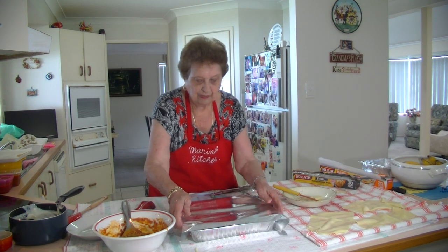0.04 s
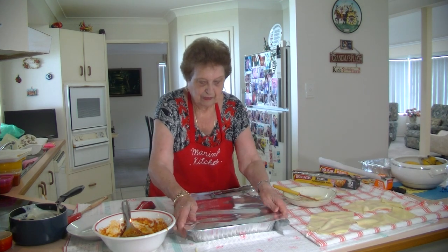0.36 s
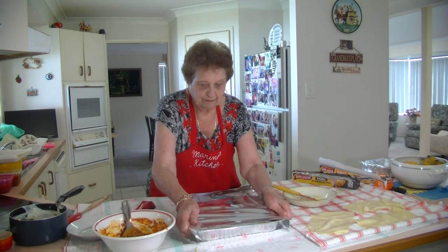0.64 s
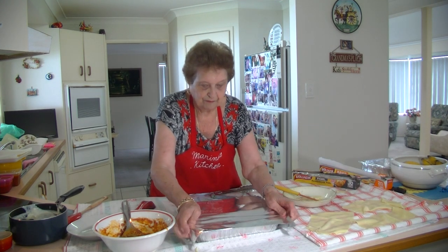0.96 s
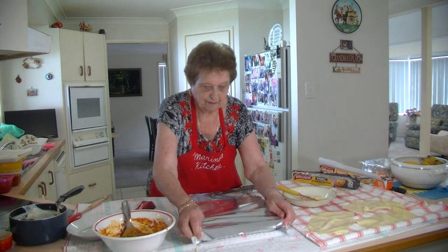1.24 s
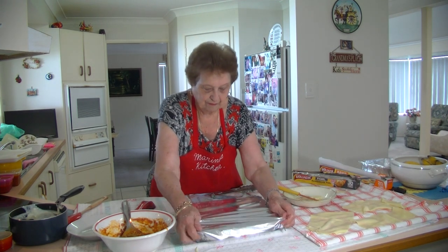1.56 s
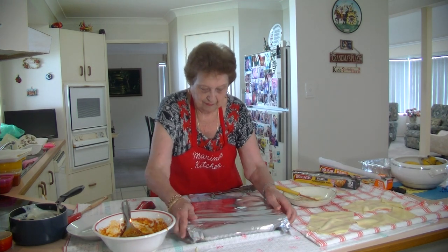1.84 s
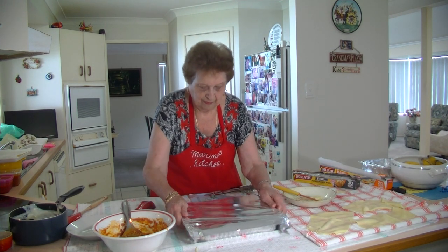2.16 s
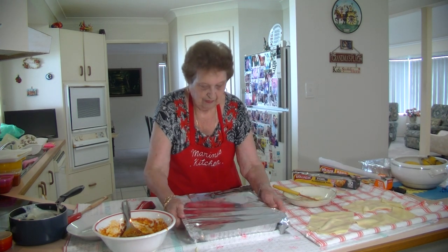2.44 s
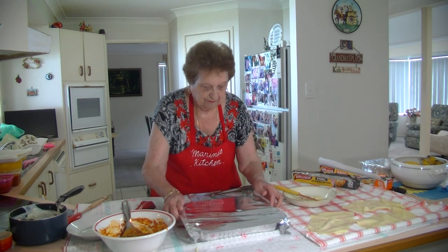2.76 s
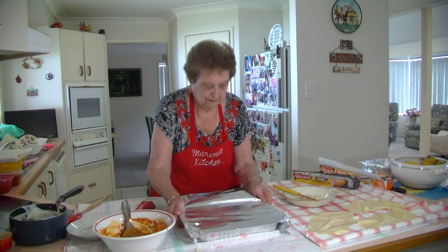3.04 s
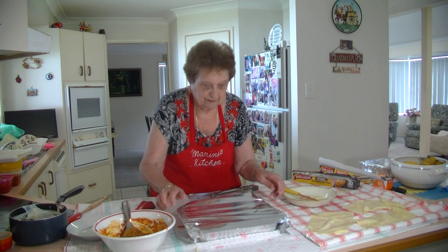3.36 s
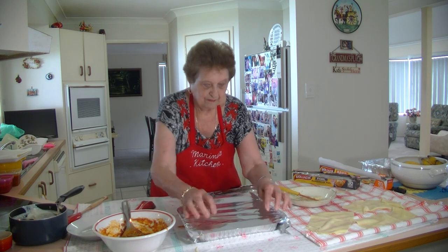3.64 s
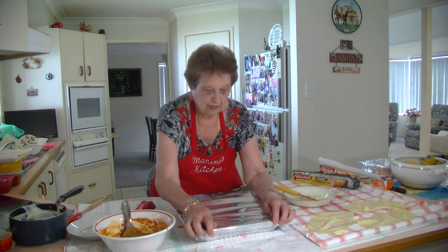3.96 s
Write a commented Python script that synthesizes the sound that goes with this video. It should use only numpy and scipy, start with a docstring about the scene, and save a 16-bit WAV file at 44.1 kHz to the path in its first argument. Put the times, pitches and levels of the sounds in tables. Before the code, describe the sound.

In a slightly echoing kitchen, nearby fingers press foil around a tray, making uneven, fizzing crackles with a few snaps and hollow pops. Bracelets clink lightly during a short break before more crinkling, all over a low fridge hum.

```python
"""Bright, fizzing crinkles come in quick bursts: foil crimped round a tray on a kitchen counter.
Each press of the fingers sets off a swarm of tiny creases and flexes the aluminium sheet, which
now and then buckles with a pop. In a pause, bangles clink as the hands move on.
The hard kitchen rings briefly, and a fridge hums underneath."""
import sys
import numpy as np
from scipy import signal
from scipy.fft import rfft, irfft, next_fast_len
from scipy.io import wavfile
from scipy.ndimage import map_coordinates

SR = 44100
rng = np.random.default_rng(int(sys.argv[2]) if len(sys.argv) > 2 else 0)


def store_wav(level_fs):
    """Save 16-bit WAV to argv[1]."""
    pcm = np.round(np.clip(np.atleast_2d(level_fs), -1, 1) * 32767)
    wavfile.write(sys.argv[1], SR, pcm.T.astype(np.int16))


N = 176400

# finger presses: start t/s, hold/s, creasing level/dB, flexing level/dB
PRESS_GESTURES = [(-.019, 0.085, -26.5, -40.5), (0.084, 0.045, -31, -46), (0.13, 0.13, -26, -42.5),
                  (.163, 0.013, -21.5, -55), (0.285, 0.057, -28, -39), (0.359, 0.054, -29.5, -39.5),
                  (0.415, 0.14, -25.5, -41), (0.533, 0.091, -24.5, -42), (0.641, .115, -25, -43.5),
                  (0.753, 0.03, -23.5, -45), (0.787, 0.081, -30, -39), (0.88, 0.038, -26, -44),
                  (0.93, 0.071, -29.5, -41), (1.02, 0.1, -26, -43.5), (1.108, 0.21, -25, -40.5),
                  (1.325, 0.12, -28, -41), (1.403, 0.026, -25.5, -38), (1.46, 0.048, -25.5, -40.5),
                  (1.51, 0.22, -30.5, -42), (1.649, 0.042, -22, -42), (1.716, .07, -23.5, -39),
                  (1.817, 0.12, -36, -45), (1.954, 0.086, -29.5, -42.5), (2.066, 0.11, -29, -51),
                  (2.13, 0.27, -25.5, -38), (2.449, 0.15, -27, -45), (2.607, 0.067, -31.5, -43.5),
                  (2.783, .04, -38.5, -49), (2.811, 0.1, -32, -48), (2.841, 0.028, -27, -47),
                  (2.92, 0.061, -26.5, -42), (2.982, 0.073, -24, -39.5), (3.07, 0.046, -22.5, -40),
                  (3.155, 0.085, -27, -45), (3.255, 0.039, -26.5, -42), (3.762, 0.044, -25.5, -42.5),
                  (3.829, 0.092, -30.5, -43), (3.917, .1, -27.5, -43)]
# bright tone of creasing foil: f/Hz, level/dB
CREASE_EQ = [(300, -38), (1200, -12), (2500, -14), (3400, -12), (4900, -9.5), (6800, -3), (9100, 0),
             (11000, -3.5), (13600, -2.5), (15500, -5.5)]


def amp(db):
    """Decibels to gain."""
    return 10 ** (np.asarray(db) / 20)


def unit_rms(x):
    """Scale to rms 1."""
    return x / np.sqrt(np.mean(x ** 2) + 1e-20)


def curve_at(points, hz):
    """Read (f/Hz, value) points on a log frequency axis."""
    freqs, values = np.transpose(points)
    return np.interp(np.log(hz + 1), np.log(freqs + 1), values)


def wobble(knots_per_s):
    """Smooth random modulation."""
    return map_coordinates(rng.standard_normal(256), [np.arange(N) * knots_per_s / SR], mode="wrap")


def filtered(x, response):
    """Filter x by a function of frequency."""
    size = next_fast_len(N + SR // 2)
    return irfft(rfft(x, size) * response(np.fft.rfftfreq(size, 1 / SR)), size)[..., :N]


def eq(x, points):
    """Shape the tone with (f/Hz, level/dB) points."""
    return filtered(x, lambda hz: amp(curve_at(points, hz)))


def add(track, start_s, sound):
    """Mix a sound into the track."""
    part = track[..., max(round(start_s * SR), 0):][..., :sound.shape[-1]]
    part += sound[..., :part.shape[-1]]


def decay(t, t60):
    """Envelope that falls 60 dB in t60 seconds."""
    return np.exp(-np.log(1000) * t / t60)


def fridge():
    """Low hum whose partials each waver in level and phase."""
    # hum partials: f/Hz, level/dB
    partials = [(48.2, -50), (100, -51.5), (86.8, -64), (170, -60.5), (341.4, -63)]
    t = np.arange(N) / SR
    hum = np.zeros(N)
    for hz, db in partials:
        gain = np.sqrt(2) * amp(db + 1.2 * wobble(1.62))
        hum += gain * np.sin(2 * np.pi * hz * t + 0.23 * wobble(1.42))
    return hum


def room_tone(level_db=-45.5):
    """A soft, wide bed of dark noise."""
    # tone of the bed: f/Hz, level/dB
    air_eq = [(25, -11), (65, 4.5), (125, -8.5), (180, -0.5), (280, -6), (400, -7.5), (600, -13),
              (1200, -15), (2500, -20.5), (4000, -25.5), (9000, -27.5), (15000, -44)]
    mid, side = eq(rng.standard_normal((2, N)), air_eq)
    return amp(level_db) * unit_rms(np.array([mid + side, mid - side]))


def kitchen_reverb(x, predelay_s=0.006):
    """Hard walls answer diffusely: each band's energy lingers as noise, different at each ear."""
    # decay of the room: f/Hz, t60/s
    decay_times = [(200, .4), (1500, .42), (6000, .39), (11000, .38), (15000, .33)]
    # tone of the reverb: f/Hz, level/dB
    reverb_eq = [(200, 11), (600, -1.5), (1200, -5), (2500, 4), (8000, 0), (15000, -5.5)]
    hz, t, spectrum = signal.stft(x, SR, nperseg=256)
    tail = decay(t[:200], curve_at(decay_times, hz)[:, None]) ** 2
    tail /= tail.sum(1, keepdims=True)
    energy = signal.fftconvolve((abs(spectrum) ** 2).mean(0), tail, axes=1)[:, :len(t)]
    noise = signal.stft(rng.standard_normal((2, N)), SR, nperseg=256)[2]
    wash = signal.istft(noise / noise.std() * np.sqrt(abs(energy)), SR, nperseg=256)[1]
    wet = np.zeros((2, N))
    add(wet, predelay_s, wash)
    return eq(wet, reverb_eq)


def bangles(roughness=0.084):
    """Thin metal bracelets touch: a scraping tick and a few high, rough modes."""
    # touches: t/s, level/dB, low modes over high modes/dB
    touches = [(3.457, -50, 3), (3.47, -42, -10), (3.663, -58, 4), (3.68, -37, -1), (3.698, -50, -5)]
    # modes of a bangle: f/Hz, level/dB, t60/s
    modes = [(5200, -8, .1), (8180, -1, 0.12), (11500, -2, .1), (12150, 0, .1), (13960, -1, .09),
             (14300, -4, .09), (15430, -7, .09)]
    clinks, t = np.zeros(N), np.arange(SR // 4) / SR
    highpass = signal.butter(2, 5000, "high", fs=SR, output="sos")
    for start, db, low_db in touches:
        tick = amp(7.5) * rng.standard_normal(len(t)) * decay(t, t60=0.019)
        clink = signal.sosfilt(highpass, tick)
        for hz, mode_db, t60 in modes:
            phase_drift = roughness * np.cumsum(rng.standard_normal(len(t)))
            tilt_db = curve_at([(5000, low_db), (14000, 0)], hz)
            clink += amp(mode_db + tilt_db) * np.sin(2 * np.pi * hz * t + phase_drift) * decay(t, t60)
        add(clinks, start, amp(db - 3) * clink)
    return clinks


def buckling(rise_s=0.00119):
    """The whole sheet buckles: a cluster of seven modes gives a hollow pop."""
    # pops: t/s, peak level/dB, centre f/Hz, t60/s, mode spread either way/octaves
    buckles = [(0.216, -26.5, 1200, 0.024, 0.46), (.804, -22.5, 1143, 0.061, 0.587),
               (.955, -32, 905, .03, 0.5), (1.183, -25, 1980, 0.02, .4), (1.236, -25, 1600, .015, 0.4),
               (1.429, -30, 845, 0.04, .8), (1.967, -30, 1200, 0.028, 0.83), (1.995, -31, 1010, .03, 0.64),
               (2.325, -23.5, 1940, 0.022, 0.31), (2.386, -18, 1540, .009, .22),
               (2.756, -33, 930, .02, 0.65), (3.01, -35, 1100, .025, .5), (3.888, -25, 2000, .012, 0.14)]
    pops, t = np.zeros(N), np.arange(SR // 16) / SR
    attack = 1 - np.exp(-(t / rise_s) ** 2)
    for start, db, hz, t60, spread in buckles:
        octaves = spread * (np.linspace(-1, 1, 7) + 0.15 * rng.standard_normal(7))
        modes_hz = hz * 2 ** octaves[:, None]
        pop = np.sin(2 * np.pi * modes_hz * (t - rise_s)).sum(0) * attack * decay(t, t60)
        add(pops, start, amp(db) * pop / abs(pop).max())
    return pops


def snapping():
    """Single folds give way, each with a sharp, bright burst of noise."""
    # snaps: t/s, level/dB
    folds = [(.172, -8), (.289, -16), (1.923, -9), (2.004, -11), (3.842, -18), (3.863, -22), (3.897, -17)]
    snaps, t = np.zeros(N), np.arange(SR // 16) / SR
    for start, db in folds:
        snap = rng.standard_normal(len(t)) * decay(t, t60=0.0038)
        add(snaps, start, amp(db) * snap / 2)
    return eq(snaps, CREASE_EQ)


def finger_pressure(levels_db, attack_s=0.013, release_t60=0.18):
    """Each press rises, holds and lets go; overlapping presses add in power."""
    start, hold = np.transpose(PRESS_GESTURES)[:2, :, None]
    t = np.arange(0, N, 32) / SR
    age = t - start
    attack = np.clip(age / attack_s, 0, 1)
    release = decay(np.maximum(age - hold, 0), release_t60)
    presses = amp(levels_db[:, None]) * attack * release
    return np.interp(np.arange(N) / SR, t, np.sqrt((presses ** 2).sum(0)))


def swarm(per_s, t60, spread_db, top_hz, tone, grain_samples, hand_pan=0.069, hand_lead_s=3e-6):
    """Stereo stream of tiny damped rings of random pitch and strength, from either hand."""
    onset, pitch, strength, hand, phase = rng.random((40000, 5))[:int(per_s * N / SR)].T[:, :, None]
    samples = np.arange(grain_samples)
    t = samples / SR
    grain_db = spread_db * np.minimum(-np.log(1 - strength), 3)  # many weak grains, few strong
    envelope = amp(grain_db) * decay(t, t60)
    positions = ((onset * N).astype(int) + samples).ravel()
    channels = []
    for side in (np.sign(hand - 0.5), np.sign(0.5 - hand)):  # +1 where the hand is on this ear's side
        ring = np.sin(2 * np.pi * (top_hz * pitch * (t + side * hand_lead_s) + phase))
        grains = envelope * ring * (1 + side * hand_pan)
        channels.append(np.bincount(positions, grains.ravel(), N)[:N])
    return unit_rms(eq(np.array(channels), tone))


def crimping():
    """The presses drive bright creases and the duller flexing of the sheet, both in uneven spurts."""
    # body of the flexing sheet: f/Hz, level/dB
    flex_eq = [(120, -21), (330, -15), (550, -5.5), (720, -5.5), (900, 0.5), (1250, -5.5), (1680, 1.5),
               (2500, -6.5), (4000, -1.5)]
    _, _, crease_db, flex_db = np.transpose(PRESS_GESTURES)
    spurts = amp(0.5 * wobble(45))
    creases = swarm(per_s=6500, t60=0.0012, spread_db=1, top_hz=16700, tone=CREASE_EQ, grain_samples=64)
    flexes = swarm(per_s=1000, t60=0.0058, spread_db=2.5, top_hz=3890, tone=flex_eq, grain_samples=256)
    creases *= finger_pressure(crease_db - 0.35)
    flexes *= finger_pressure(flex_db - 0.7)
    return spurts * (creases + flexes)


def scene(right_lead_s=9.1e-6):
    """Foil and bangles just left of centre in the kitchen, over fridge hum and room tone."""
    # stereo balance: f/Hz, left over right/dB
    balance = [(300, 2.5), (1000, 0.6), (8000, 1.2), (13000, -0.9)]
    close = crimping() + buckling() + snapping() + bangles()
    sides = np.array([[0.5], [-0.5]])  # left, right
    direct = filtered(close, lambda hz: np.exp(-2j * np.pi * hz * sides * right_lead_s))
    in_room = direct + kitchen_reverb(close)
    panned = filtered(in_room, lambda hz: amp(sides * curve_at(balance, hz)))
    return amp(0.5) * panned + fridge() + room_tone()


def record(dry, cutoff_hz=15780):
    """A brick-wall low-pass trims the very top of the mix."""
    return filtered(dry, lambda hz: hz < cutoff_hz)


dry = scene()
out = record(dry)
store_wav(out)
```